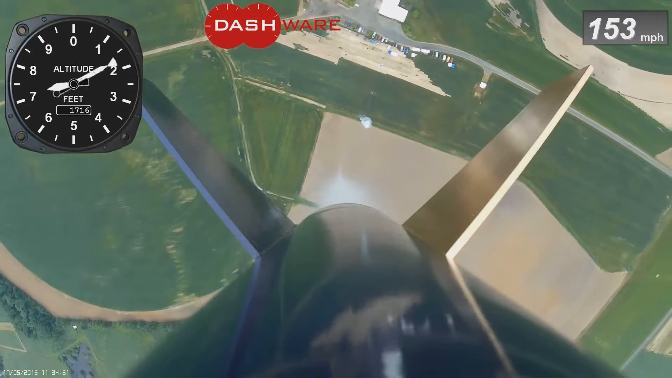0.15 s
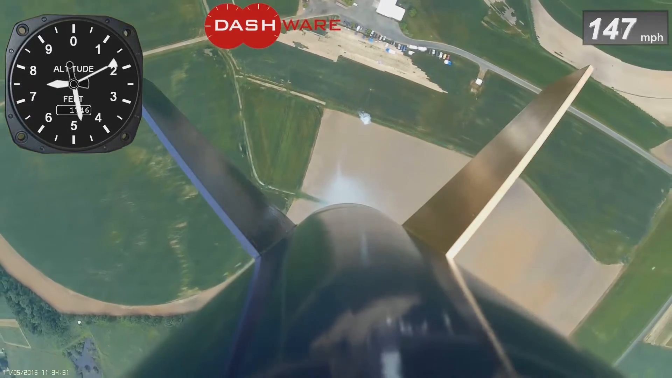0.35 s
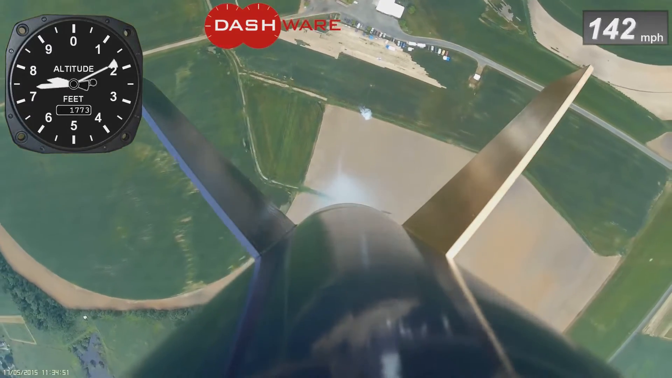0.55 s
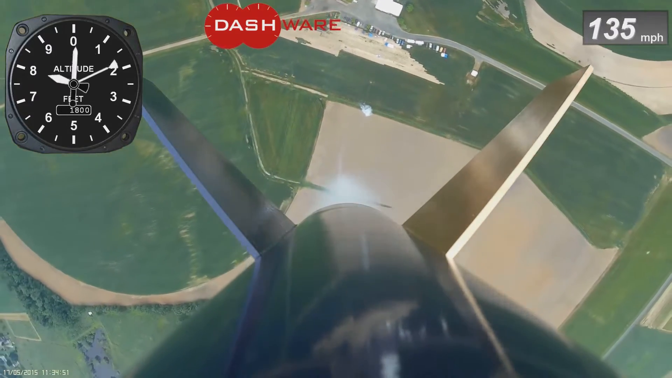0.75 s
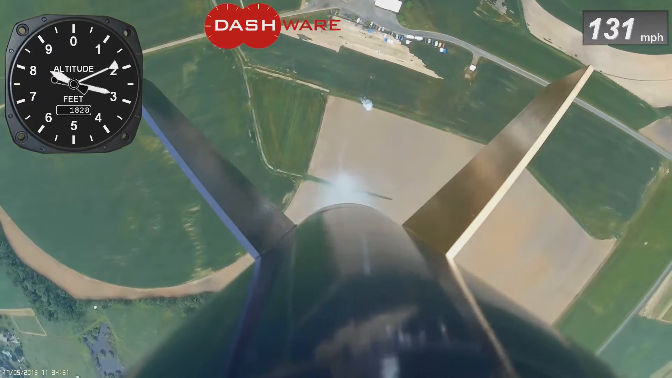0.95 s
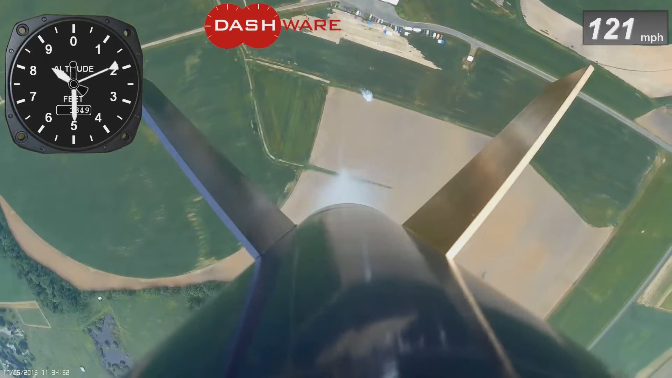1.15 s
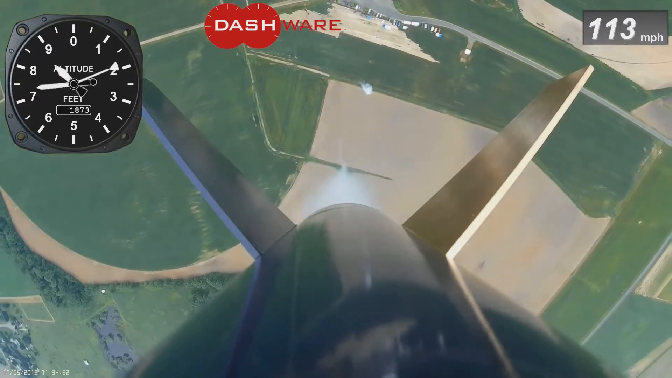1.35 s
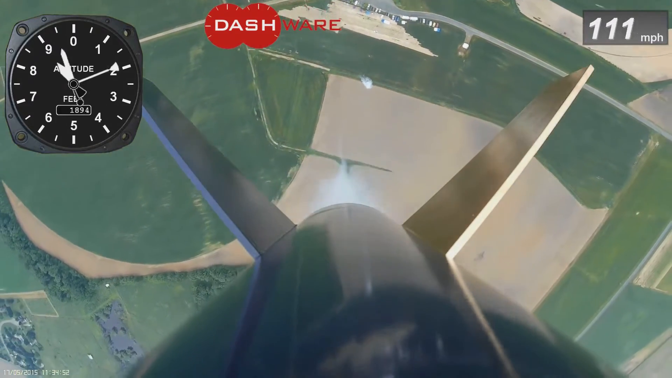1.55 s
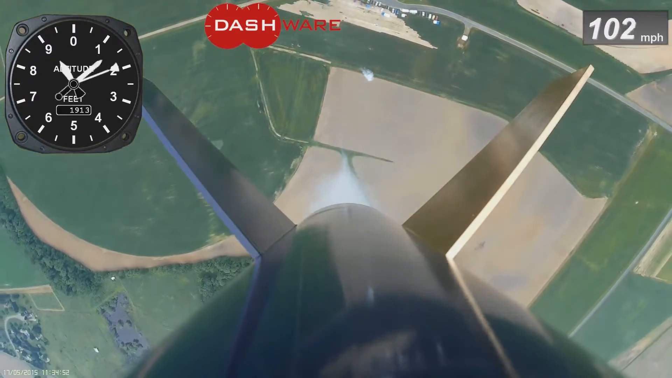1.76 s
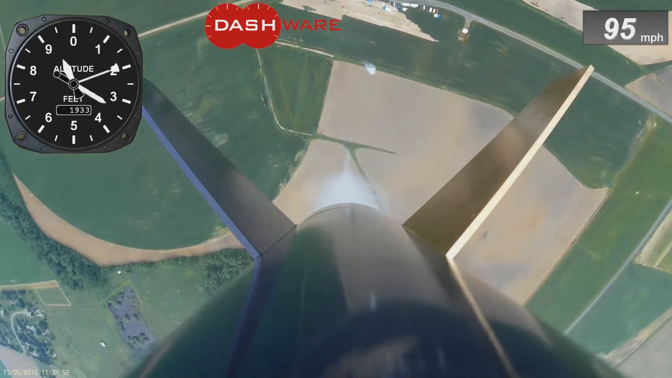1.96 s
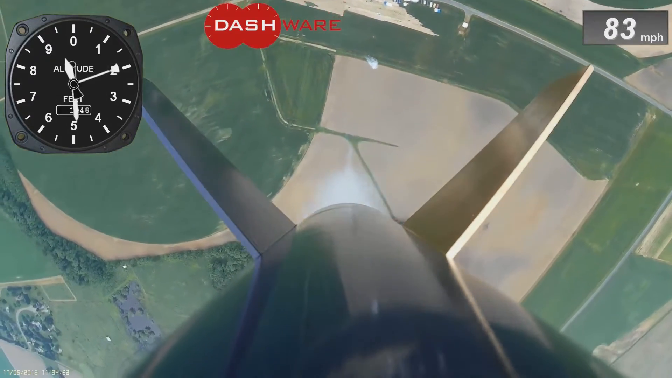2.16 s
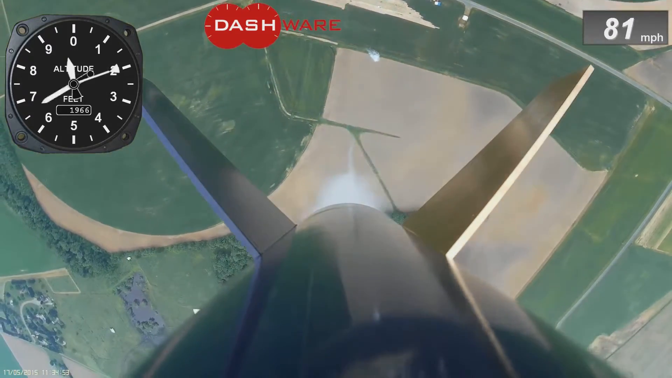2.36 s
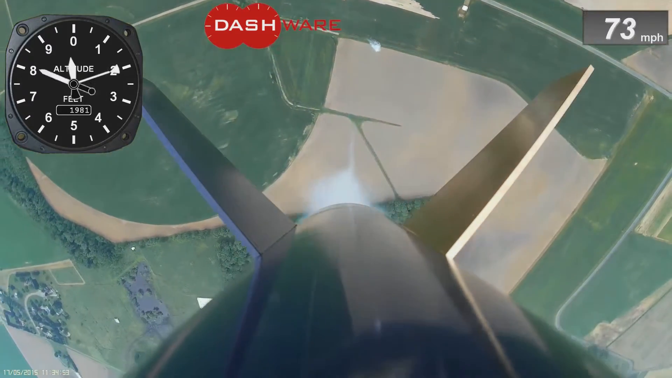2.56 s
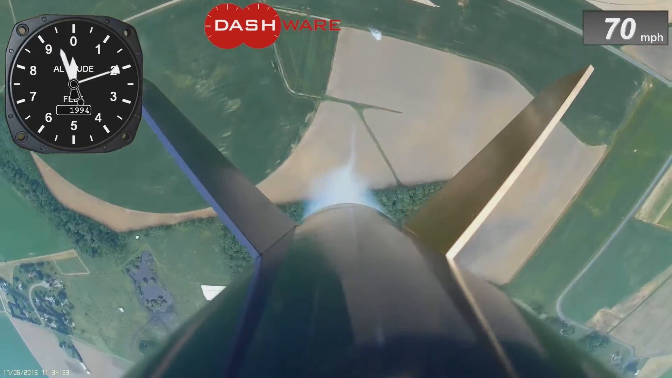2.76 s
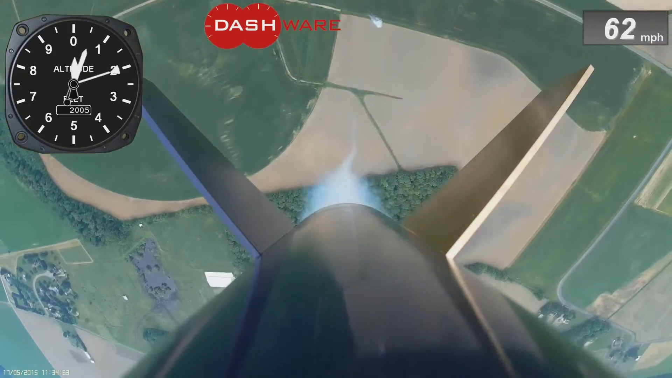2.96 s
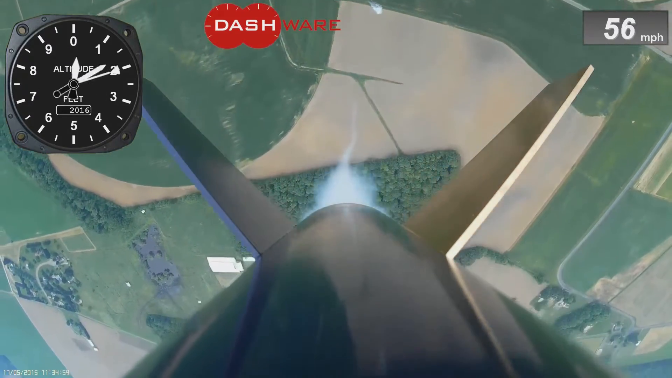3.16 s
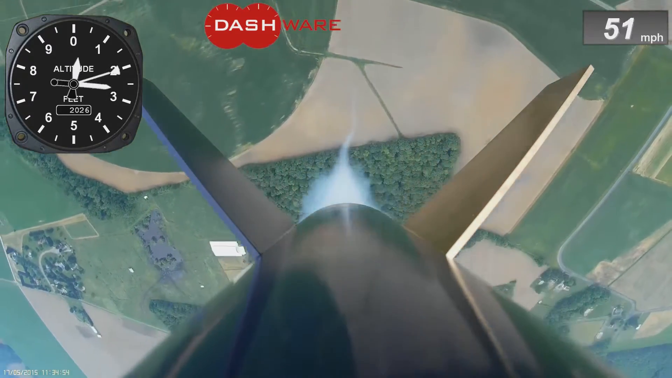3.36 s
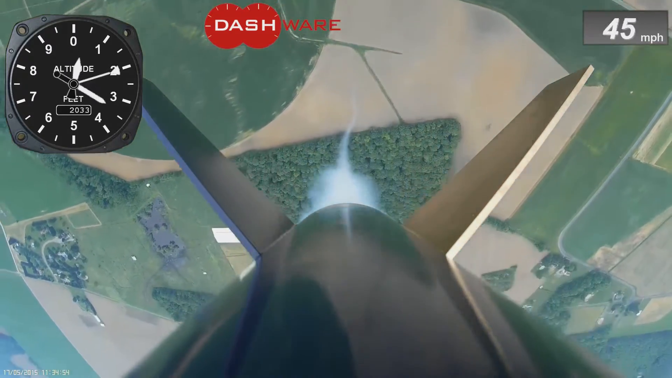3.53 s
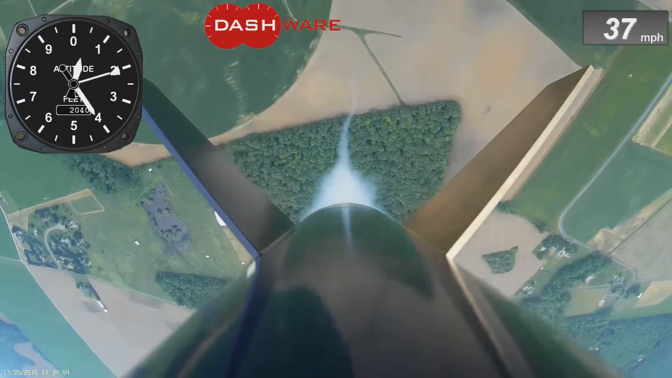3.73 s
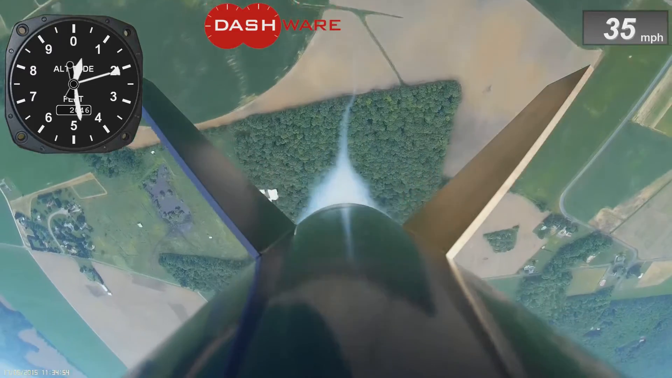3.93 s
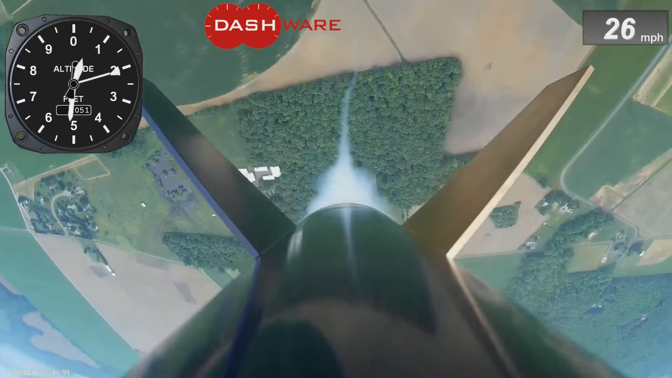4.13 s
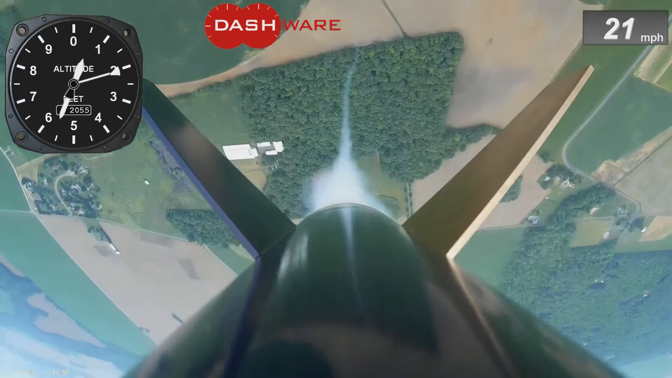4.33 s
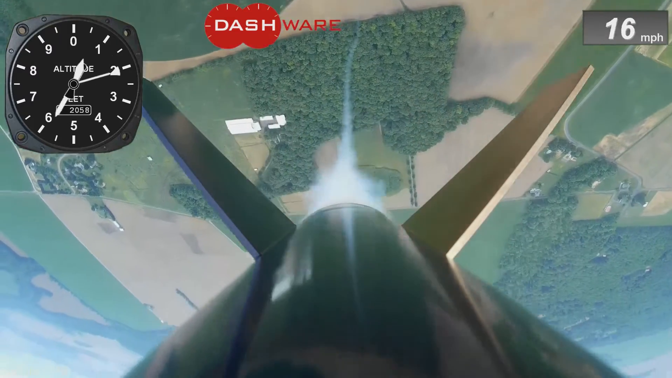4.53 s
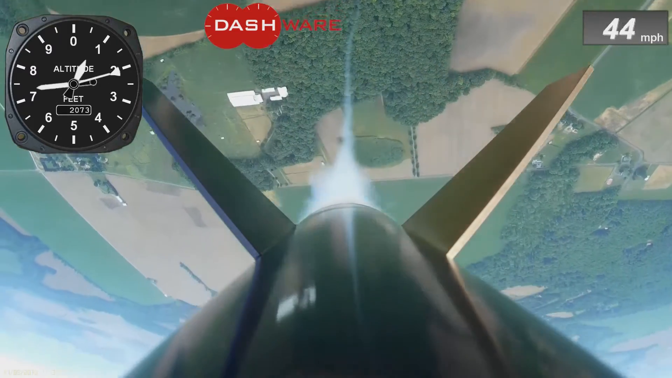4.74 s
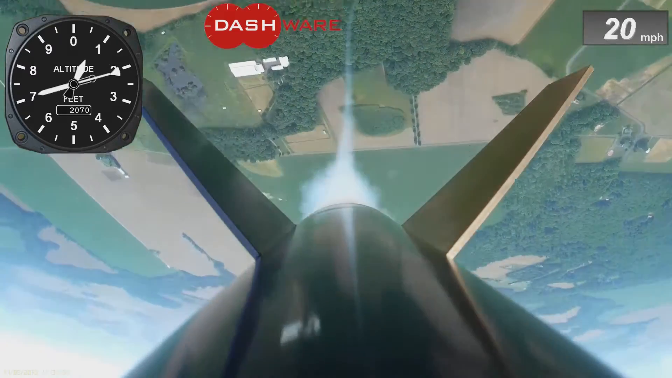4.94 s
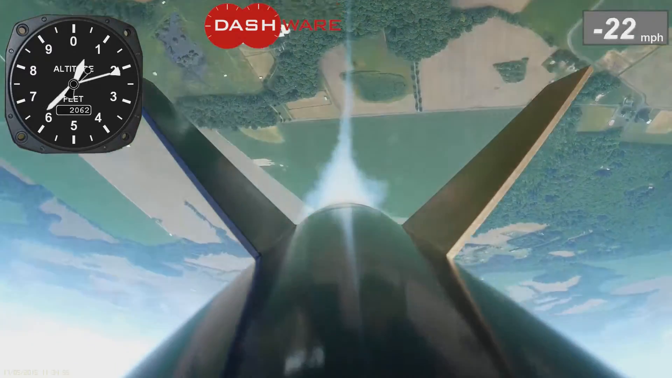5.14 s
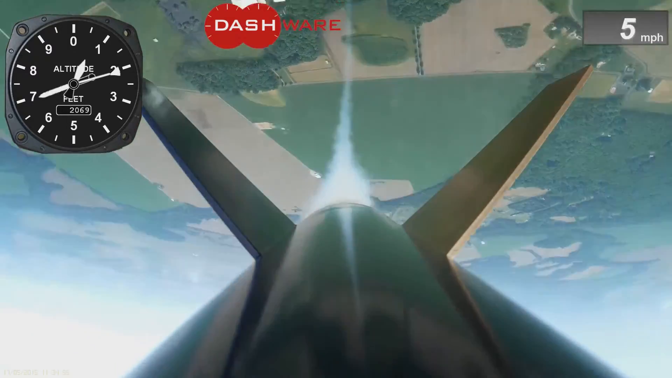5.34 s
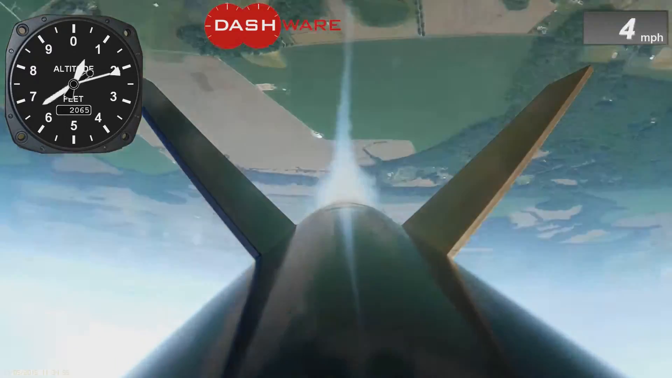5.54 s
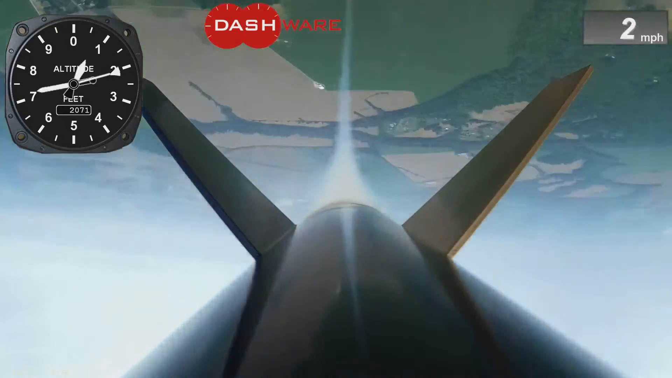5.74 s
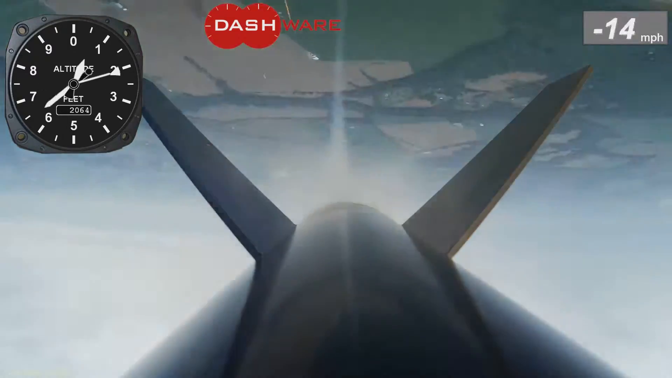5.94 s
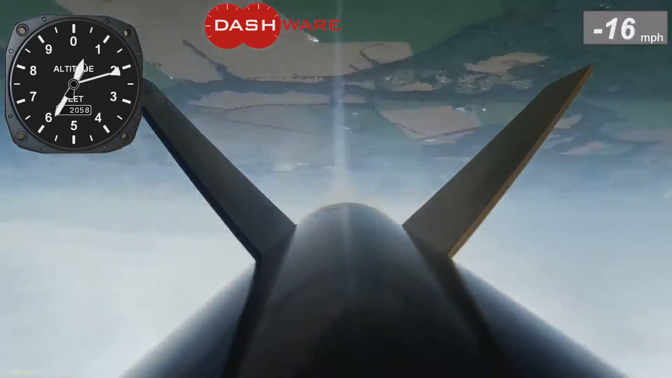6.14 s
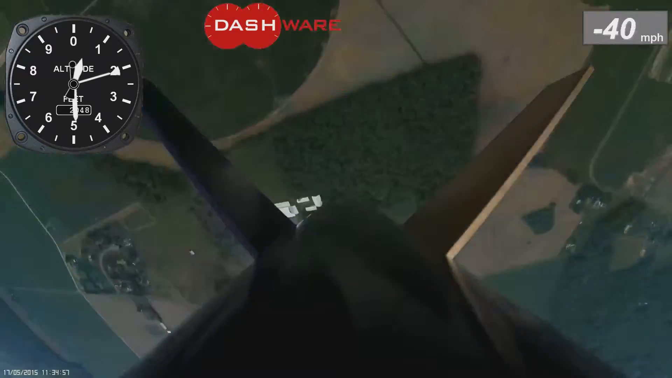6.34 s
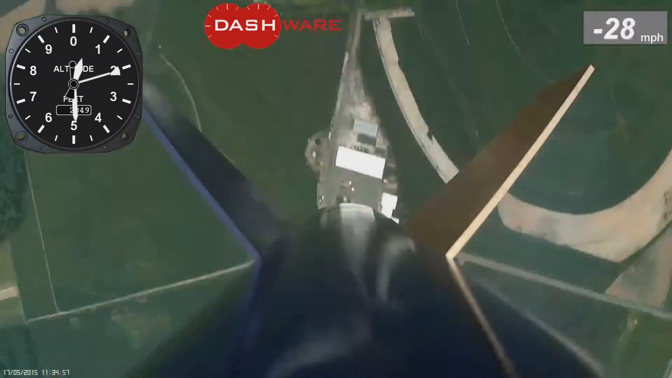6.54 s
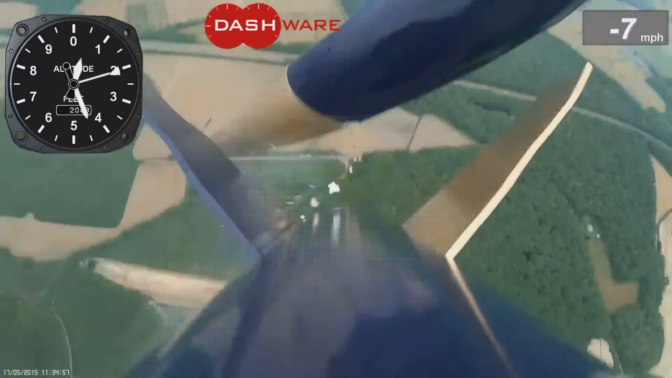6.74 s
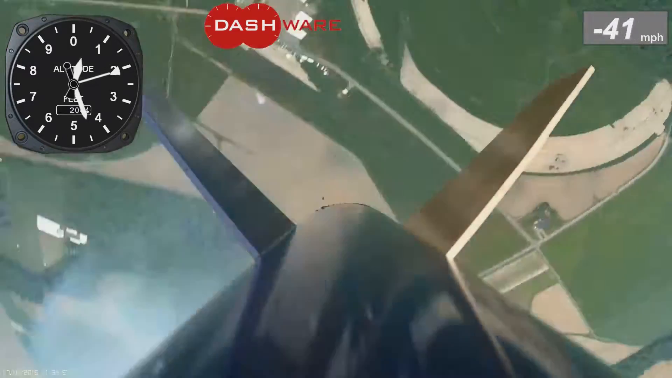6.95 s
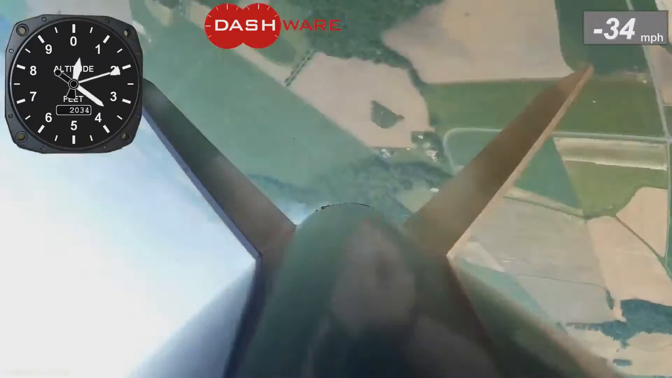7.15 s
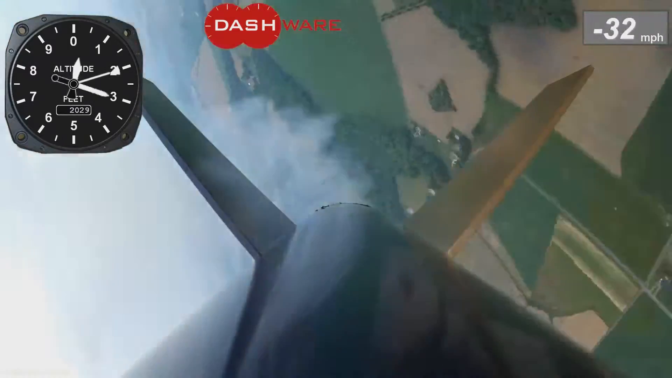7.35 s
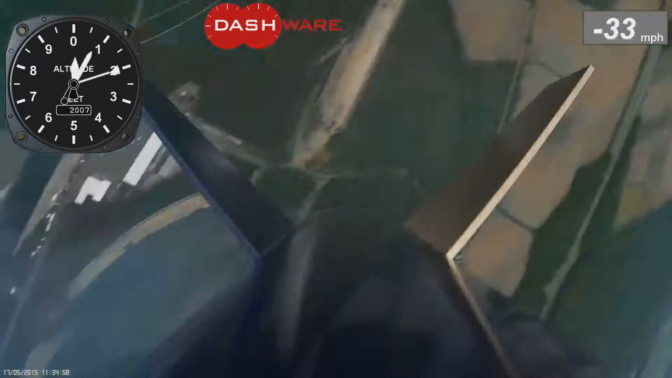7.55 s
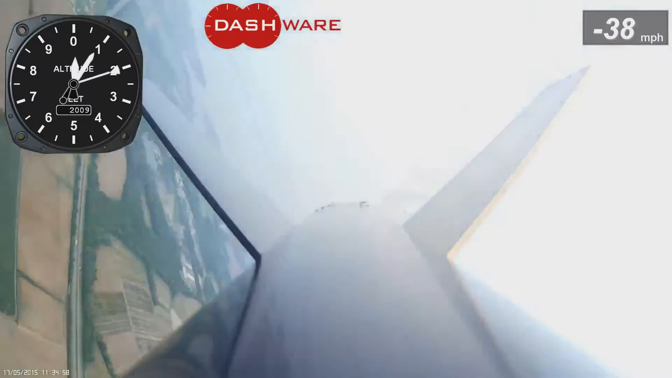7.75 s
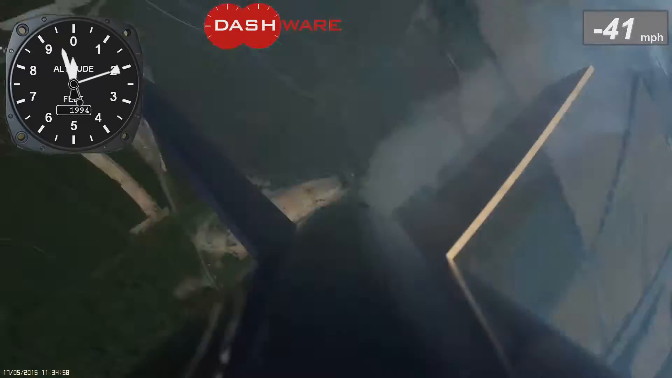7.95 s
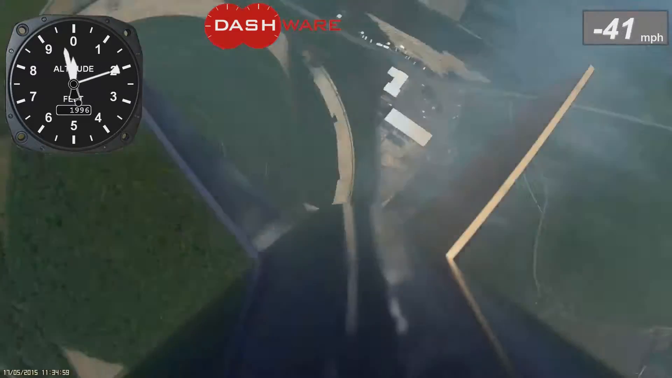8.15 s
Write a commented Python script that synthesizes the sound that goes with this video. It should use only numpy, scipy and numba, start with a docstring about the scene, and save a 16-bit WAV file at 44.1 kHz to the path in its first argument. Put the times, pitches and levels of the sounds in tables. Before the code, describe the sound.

Heard from a microphone on the side of a model rocket high in the air, a distorted wind roar with a low drone steadily sinks in pitch and level. Then comes a cluster of sharp cracks, short rattles and hollow tube knocks. Air hums briefly across the open tube, and the rest is choppy, swishing wind and bursts of low buffeting as the rocket tumbles on its cord.

```python
"""On the side of a model rocket in flight, at the microphone of a small strapped-on camera.
The rocket coasts up and slows, so the wind sinks and darkens; then charges crack and it tumbles on its cord.
Eddies buffet the microphone port into overload, and the slipstream hisses and whooshes in the housing.
Blows ring the body tube, the air inside knocks hollowly, and air across its open end hums and swoops."""
import sys
import numpy as np
from scipy import signal
from scipy.io import wavfile
from scipy.ndimage import uniform_filter1d
from numba import njit

SR = 44100
rng = np.random.default_rng(int(sys.argv[2]) if len(sys.argv) > 2 else 0)


def unload_wav(signal):
    """Save mono or channel-first audio to the path in sys.argv[1] as 16-bit WAV at rate SR, clipped to [-1, 1]."""
    wavfile.write(
        sys.argv[1],
        SR,
        np.round(np.clip(np.atleast_2d(signal).T, -1, 1) * 32767).astype(np.int16),
    )


N = 365588

# The coasting wind, one row apiece for buffet, rush, hiss, sizzle and highest hiss.
# Each row: opening level in dB, dB lost per halving of the speed, dB lost per halving squared.
COAST_LEVELS = [(2, 13, -1.4), (-12, 7.5, -0.3), (-14.5, 9.5, 0.5), (-22, 6.5, 7.5), (-28, 4, 22)]
# Eddies peel off the housing more slowly as the rocket slows. Each row: time in seconds, rate in Hz.
SHEDDING_RATE = [(0, 265), (.35, 268), (.65, 256), (1, 228), (1.5, 204), (2, 179), (2.45, 163), (3, 136),
                 (3.5, 124.4), (4, 109.5), (4.5, 98.5), (5.05, 97)]
# The colours of the slipstream: a low rush, a hiss in the housing, a sizzle at the port.
# Each row: centre in Hz, width of one filter pass in Hz, level in dB.
RUSH_MODES = [(250, 320, 5.5), (469, 670, 6.5), (897, 820, 7), (1250, 350, -32)]
HISS_MODES = [(2425, 800, 15), (2750, 530, -1), (1730, 950, 5.5), (4400, 2540, 2.5), (4910, 240, -3.5)]
SIZZLE_MODES = [(7500, 2840, 3.8), (9490, 1700, 5.7), (10760, 850, 0.5)]
# Charges and blows. Each row: start in seconds, level in dB, rattle hold in seconds, 60 dB fade in
# seconds, treble in dB, thump in dB, tube pitch in Hz, strike in dB. Treble, thump and strike add to level.
BLOWS = [(5.067, 1.5, 0.017, 0.067, 35, -17, 1120, 33), (5.079, 12, 0.021, 0.068, 3, -10.5, 1275, 23.5),
         (5.096, -5.5, 0.014, 0.075, 3, -2.5, 1210, 20), (5.129, -4.5, 0.0091, 0.039, -5, -3, 1320, 37),
         (5.238, -10, 0.0078, 0.018, 4, -1.5, 1230, 29), (5.416, 0, 0.011, 0.1, 7, -6, 1230, 29),
         (5.425, -4.5, 0.0064, 0.05, -3, -10, 1200, 31), (5.441, 6.5, 0.01, 0.089, 1, -12, 1146, 32),
         (5.472, 1.5, 0.0075, 0.029, -14, -16, 1304, 31), (5.642, -16, 0.0044, 0.0255, 1, 4, 1200, 25),
         (5.681, -13, 0.0031, 0.03, 0, -10, 2500, 34), (5.822, 2.5, 0.011, 0.037, 16, -2.5, 1220, 22),
         (5.963, -19, 0.0082, 0.031, -5, 12, 1200, 19), (6.002, -22, 0.0039, 0.051, -10, 12, 1210, 23),
         (6.015, 20, 0.011, 0.041, 25.5, -12.5, 1090, 25), (6.03, 14, 0.018, 0.034, -1, -3.5, 1295, 22),
         (6.065, -8.5, 0.0033, 0.073, -1.5, 14.5, 1200, 24), (6.072, -17, .003, 0.014, -3, -14, 1190, 21),
         (6.11, -27.5, 0.0063, 0.053, -20, 25.5, 1200, 24), (6.144, -13.5, 0.0017, 0.022, 18, -8, 1190, 28),
         (6.886, 3.5, 0.006, 0.032, 8, -24, 1272, 31)]
# The ring of the body tube. Each row: multiple of the tube pitch, width as a share of centre, level in dB.
TUBE_MODES = [(0.999, 0.055, 4.5), (1.09, 0.1, -4.5), (1.55, 0.036, -9.5), (2.0, .06, -18),
              (2.75, .14, -38.5)]
# The low flex of the whole airframe. Each row: centre in Hz, width in Hz, level in dB.
AIRFRAME_MODES = [(150, 52, -2), (290, 150, -8), (388, 47, -1), (492, 83, -4)]
# Knocks of the air column. Each row: start in seconds, pitch in Hz, level in dB, 60 dB fade in seconds.
HOLLOW_KNOCKS = [(5.095, 340, -7.5, .1), (5.417, 480, -4, 0.13), (5.46, 520, -5, .05),
                 (5.641, 660, -3, .06), (5.655, 560, -4, .05), (5.728, 420, -4, .05), (5.746, 330, -8, .06),
                 (5.76, 560, -9, .05), (5.785, 400, -4, .06), (5.806, 720, -4, 0.055),
                 (6.383, 424, -4, 0.055), (6.447, 200, -10.5, .2), (6.49, 240, -12, 0.16)]
# Buffet on the port in the tumble. Each row: time in seconds, level in dB, low-pass corner in Hz.
TUMBLE_BUFFET = [(5.15, -14, 88), (5.41, -18.5, 89.8), (5.5, -6.5, 92), (5.606, -10, 109.3),
                 (5.64, -2.5, 111), (5.667, 17, 89.5), (5.684, -9, 110), (5.71, 11, 140), (5.74, -4, 190.5),
                 (5.81, -13, 200), (5.93, -44, 91), (5.965, 11, 65.7), (6.012, 17, 70), (6.03, -20, 70),
                 (6.06, -0.5, 71), (6.08, 5, 75), (6.095, -18, 74.5), (6.11, 7, 69.2), (6.128, -7, 69.8),
                 (6.14, -23, 60), (6.371, -15, 35), (6.42, -8, 25), (6.459, -10.5, 32), (6.64, -10.5, 81.6),
                 (6.749, -3, 90), (6.88, -6, 108.5), (6.945, 6.5, 114.5), (7.015, -2, 111),
                 (7.2, 5.5, 107.3), (7.275, 0.5, 110), (7.309, 0, 108.5), (7.52, -0.5, 104.5),
                 (7.572, 0.5, 69.7), (7.595, -24, 60), (7.65, -33, 79.2), (7.751, -18, 103),
                 (7.989, -12.5, 115), (8.029, 3.5, 116), (8.215, -3, 118), (8.27, 7, 116.4)]
# Swings through the slipstream. Each row: peak time, rise and fall in seconds, rush in dB, hiss in dB.
SWINGS = [(5.2, 0.089, 0.11, -27, -56), (5.29, 0.039, 0.2, -23, -33.5), (5.531, 0.19, 0.37, -19, -26.5),
          (5.69, 0.069, 0.13, -6.5, -16.5), (5.78, 0.1, 0.11, -20, -34), (5.92, 0.16, 0.086, -21, -24),
          (6.2, 0.13, 0.12, -21, -23), (6.339, 0.14, 0.045, -15.5, -20.5), (6.375, 0.046, 0.044, -17, -44),
          (6.53, 0.066, 0.067, -34, -35), (6.62, 0.091, 0.021, -27, -30.5), (6.68, 0.066, .06, -29.5, -60),
          (6.77, 0.05, 0.055, -17.5, -32), (6.84, 0.045, 0.021, -31, -61), (6.945, 0.05, 0.12, -20, -37),
          (7.01, 0.045, 0.043, -19.5, -33), (7.08, 0.06, 0.029, -17.5, -32),
          (7.118, 0.015, 0.027, -16, -31), (7.153, 0.01, 0.02, -20, -36), (7.198, 0.027, 0.045, -23, -25.5),
          (7.228, 0.0086, 0.012, -20, -40), (7.274, 0.017, 0.035, -19.5, -31.5),
          (7.32, 0.01, 0.021, -19, -38), (7.35, 0.01, 0.02, -25, -47), (7.39, 0.038, 0.042, -19, -43),
          (7.47, 0.059, 0.053, -19, -37.5), (7.64, 0.034, 0.091, -33, -30.5),
          (7.74, 0.039, 0.21, -15, -21.5), (7.92, 0.07, 0.23, -23, -55), (8.067, 0.038, 0.072, -27, -31),
          (8.16, 0.039, 0.023, -16, -38), (8.215, 0.029, 0.074, -16.5, -28)]
# The fader ride of the tube's hum. Each row: time in seconds, level in dB.
HUM_LEVEL = [(6.09, -55), (6.115, -3), (6.14, -22), (6.2, -20), (6.26, -22), (6.32, -20), (6.35, -30),
             (6.37, -60)]
# The notes in that hum. Each row: pitch in Hz, waver in Hz, level in dB.
HUM_NOTES = [(405, 11.85, -0.5), (482, 12.04, -0.5), (905, 38.7, -7)]
# The sinking swoop of the open tube. Each row: time in seconds, centre in Hz, level in dB.
SWOOP_PATH = [(7.63, 1140, -36), (7.7, 1100, -14), (7.75, 910, -19), (7.84, 740, -9.5), (7.91, 666, -18),
              (7.97, 590, -11.5), (8.02, 520, -44)]

TUMBLE_S, CROSSFADE_S = 5.1, 0.04  # the first charge ends the straight flight
SLAPS_PER_S, SLAP_SPREAD_DB = 45, 3.5
COAST_CORNER_HZ, CORNER_POWER = 129.3, 0.42  # the buffet darkens as the speed drops
TUMBLE_SHED_HZ, SHED_WIDTHS = 75, (0.34, 0.21)  # widths as shares of the rate: fast flight, slow flight
FLUTTER_DB_PER_HALVING, FLUTTER_PER_S = 1.44, 18
GUSTS_PER_S, CRACKLE_DB, CRACKLE_PER_S = 70, 2.5, 240
SWELL_DB, SWELL_PER_S = 1.4, 6.5
WHOOSH_POWERS, LULL_DB = (0.74, 0.97), (-30, -62)  # steepness and floor, both as (rush, hiss)
WAVER_DB, WAVERS_PER_S = 2, 60
OVERLOAD, CLIP_HARDNESS, TOP_HZ = 0.72, 15.0, 16300
TIME = np.arange(N) / SR


def undb(db):
    """Decibels to gain."""
    return 10 ** (np.asarray(db) / 20)


def unit(x):
    """Scale to rms 1."""
    return x / np.sqrt(np.mean(x ** 2))


def curves(table):
    """Draw each column after the time as a curve, one value per sample."""
    times, *columns = np.transpose(table)
    return [np.interp(TIME, times, column) for column in columns]


def noise():
    """White noise."""
    return rng.standard_normal(N)


def wobble(per_s):
    """A smooth random wobble, spread near 1, with per_s new values a second."""
    hold = int(SR / per_s)
    steps = np.repeat(rng.standard_normal(N // hold + 1), hold)
    return 0.8 * uniform_filter1d(uniform_filter1d(steps, hold), hold)[:N]


def cut(x, order, hz, kind="low"):
    """Butterworth low-pass or high-pass."""
    return signal.sosfilt(signal.butter(order, hz, kind, fs=SR, output="sos"), x)


@njit
def sweep(x, hz, width):
    """State-variable filter with a moving centre; returns low-pass and band-pass."""
    low, band = np.empty(len(x)), np.empty(len(x))
    band_state, low_state = 0., 0.
    for i in range(len(x)):
        g = np.tan(np.pi * hz[i] / SR)
        v = (band_state + g * (x[i] - low_state)) / (1 + g * (g + width))
        low[i], band[i] = low_state + g * v, width * v
        band_state, low_state = 2 * v - band_state, low_state + 2 * g * v
    return low, band


def steep_band(x, hz, width):
    """Two passes of a moving band-pass; width is a share of the centre."""
    return sweep(sweep(x, hz, width)[1], hz, width)[1]


def ring(x, modes, passes=1):
    """A bank of fixed resonances; more passes make each one steeper."""
    out = 0
    for hz, width_hz, db in modes:
        band = x
        for _ in range(passes):
            band = signal.lfilter(*signal.iirpeak(hz, hz / width_hz, fs=SR), band)
        out = out + undb(db) * band
    return out


def by_phase(coast, tumble):
    """Crossfade a setting from its coasting value to its tumbling value."""
    return coast + np.clip((TIME - TUMBLE_S) / CROSSFADE_S, 0, 1) * (tumble - coast)


def eddy_slaps():
    """Lone eddies slap the port: sparse pushes of either sign and uneven size."""
    hits = rng.random(N) < SLAPS_PER_S / SR
    return unit(hits * np.sign(noise()) * undb(SLAP_SPREAD_DB * rng.exponential(size=N)))


def shedding_drone(coast_hz, halvings):
    """Eddies shed by the housing drone; as the coast slows, the note narrows and gains an octave."""
    hz = by_phase(coast_hz, TUMBLE_SHED_HZ)
    slowed = by_phase(np.clip(halvings / halvings[-1], 0, 1), 0)
    fast, slow = (unit(steep_band(noise(), hz, width) / np.sqrt(hz)) for width in SHED_WIDTHS)
    octave = unit(steep_band(eddy_slaps(), 2 * hz, width=0.4) / np.sqrt(hz))
    return np.sqrt(1 - slowed) * fast + np.sqrt(slowed) * slow + slowed * undb(-7.5) * octave


def port_buffet(shed_hz, halvings, tumble_corner_hz):
    """Big eddies rumble on the port over the drone, breaking into slaps and flutter as the speed drops."""
    slap_share = np.clip(by_phase(0.52 * halvings, 0.39), 0, 1)
    eddies = np.sqrt(1 - slap_share) * noise() + np.sqrt(slap_share) * eddy_slaps()
    corner_hz = by_phase(COAST_CORNER_HZ * (shed_hz / shed_hz[0]) ** CORNER_POWER, tumble_corner_hz)
    rumble = sweep(eddies, corner_hz, 1.7)[0]
    rumble = sweep(rumble, 4.5 * corner_hz, 0.73)[0]
    rumble = unit(cut(rumble / np.sqrt(corner_hz), 1, 32, "high"))
    flutter_db = by_phase(FLUTTER_DB_PER_HALVING * halvings, 0) * wobble(FLUTTER_PER_S)
    drone_db = by_phase(-4, -13) + flutter_db / 2
    return undb(flutter_db) * rumble + undb(drone_db) * shedding_drone(shed_hz, halvings)


def blown(modes, passes, top_hz):
    """Resonances, each blown by its own turbulence, rolled off above top_hz."""
    return unit(cut(sum(ring(noise(), [mode], passes) for mode in modes), 4, top_hz))


def slipstream(levels_db, tumble_buffet_db):
    """Small eddies rush, hiss and sizzle in housing and port; each gust lifts all the bands together."""
    rush_db, hiss_db, sizzle_db, highest_db = levels_db
    gust_depth_db = by_phase(1.03, np.maximum(4 + 0.24 * tumble_buffet_db, 0))
    gust_db = gust_depth_db * wobble(GUSTS_PER_S) + by_phase(0, CRACKLE_DB) * wobble(CRACKLE_PER_S)
    rush = blown(RUSH_MODES, passes=2, top_hz=3650) * undb(rush_db)
    hiss = blown(HISS_MODES, passes=2, top_hz=7960) * undb(hiss_db + SWELL_DB * wobble(SWELL_PER_S))
    sizzle = blown(SIZZLE_MODES, passes=3, top_hz=11500) * undb(sizzle_db)
    highest = unit(ring(noise(), [(11670, 3500, 0)], passes=3)) * undb(highest_db)
    return (rush + hiss + sizzle + highest) * undb(gust_db)


def wind():
    """Buffet and slipstream fade with the speed, the highest hiss first, then surge in the tumble."""
    shed_hz, = curves(SHEDDING_RATE)
    halvings = np.log2(shed_hz[0] / shed_hz)  # of the speed, which the shedding rate follows
    tumble_db, tumble_corner_hz = curves(TUMBLE_BUFFET)
    coast_db = np.array([db - loss * halvings - bend * halvings ** 2 for db, loss, bend in COAST_LEVELS])
    buffet_db, *slipstream_db = by_phase(coast_db, np.array([tumble_db, *whoosh_levels(tumble_db)]))
    buffet = port_buffet(shed_hz, halvings, tumble_corner_hz) * undb(buffet_db)
    return buffet + slipstream(slipstream_db, tumble_db)


def cracks():
    """Each charge or blow is a sharp spit, then a fading rattle that rings the tube and the airframe."""
    strike, shake, spit, thump = np.zeros((4, N))
    tube_hz = np.full(N, float(BLOWS[0][6]))
    for start, db, hold, t60, treble_db, thump_db, hz, strike_db in BLOWS:
        i = int(start * SR)
        span = slice(i, i + SR // 4)
        age = np.abs(TIME[span] - start)
        fade = undb(db - 60 * np.maximum(age - hold, 0) / t60)
        strike[i + 30] += undb(db + strike_db)
        tube_hz[i:] = hz  # where the blow lands sets the pitch
        shake[span] += fade * (1 - np.exp(-age / 0.0021))
        thump[span] += undb(thump_db) * fade
        spit[span] += undb(treble_db) * (undb(-29) * fade + undb(db) * np.exp(-age / 0.0012))
    rattle = undb(0.83 * wobble(210))
    bright = ring(noise(), [(4480, 6600, 24), (7500, 1700, -9.5), (12400, 5000, -14)])
    snap = spit * rattle * unit(cut(bright, 4, 14500))
    push = strike + shake * rattle * noise()
    tube = sum(undb(db) * sweep(push, multiple * tube_hz, width)[1] for multiple, width, db in TUBE_MODES)
    airframe = ring(thump * noise(), AIRFRAME_MODES)
    return undb(4.5) * tube + undb(13) * airframe + undb(-23) * snap


def hollow_knocks():
    """The air column of the airframe, rung once per knock: it swells over a cycle and rings out."""
    out, age = np.zeros(N), np.arange(SR // 4) / SR
    for start, hz, db, t60 in HOLLOW_KNOCKS:
        i = int(start * SR)
        envelope = undb(db - 60 * age / t60) * np.minimum(age * hz, 1)
        out[i:i + len(age)] += envelope * np.sin(2 * np.pi * hz * age)
    return out


def whoosh_levels(buffet_db):
    """The four slipstream levels in dB, swelling and dying as the housing swings through the flow."""
    gains = np.outer(undb(LULL_DB), np.ones(N))
    for peak, rise, fall, *peak_db in SWINGS:
        swell = np.clip(np.minimum(1 + (TIME - peak) / rise, 1 - (TIME - peak) / fall), 0, 1)
        gains += [undb(db) * swell ** power for db, power in zip(peak_db, WHOOSH_POWERS)]
    rush_db, hiss_db = 20 * np.log10(gains)
    dulling_db = 0.83 * np.maximum(buffet_db + 8.5, 0)  # cross-flow on the port dulls the sizzle
    sizzle_db = hiss_db - 21.5 - dulling_db
    highest_db = -39 + 2.15 * (sizzle_db + 30)
    return rush_db, hiss_db, sizzle_db, highest_db


def tube_hum():
    """Air hums across the open tube: rough notes that waver in pitch and level."""
    level_db, = curves(HUM_LEVEL)
    notes = np.zeros(N)
    for hz, waver_hz, db in HUM_NOTES:
        phase = 2 * np.pi * np.cumsum(hz + waver_hz * wobble(WAVERS_PER_S)) / SR
        notes += np.sqrt(2) * undb(db + WAVER_DB * wobble(WAVERS_PER_S)) * np.sin(phase)
    gate = (TIME > HUM_LEVEL[0][0]) & (TIME < HUM_LEVEL[-1][0])
    return gate * undb(level_db) * notes


def tube_swoop():
    """One wide, breathy resonance sinks as the open tube swings across the flow."""
    hz, db = curves(SWOOP_PATH)
    gate = (TIME > SWOOP_PATH[0][0]) & (TIME < SWOOP_PATH[-1][0])
    return gate * undb(db) * unit(steep_band(noise(), hz, width=0.74))


def scene():
    """Wind, cracks, knocks, hum and swoop meet at the one microphone."""
    return (wind() + cracks() + hollow_knocks() + tube_hum() + tube_swoop())[None]


def record(dry):
    """Loud peaks clip nearly flat; a faint fizz is added while they overload, and the top end is cut."""
    clipped = dry / (1 + np.abs(dry / OVERLOAD) ** CLIP_HARDNESS) ** (1 / CLIP_HARDNESS)
    treble = cut(dry - clipped, 2, 700, "high")
    fizz = 0.046 * np.tanh(undb(-8.5) * treble / 0.054)
    centred = cut(clipped + fizz, 1, 2.0, "high")
    return signal.sosfilt(signal.ellip(8, 0.2, 80, TOP_HZ, fs=SR, output="sos"), centred)


dry = scene()
out = record(dry)
unload_wav(out)
```